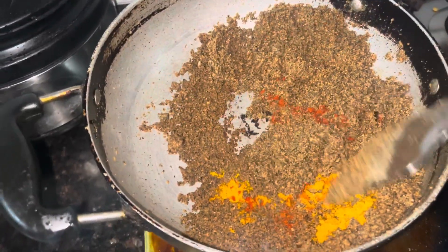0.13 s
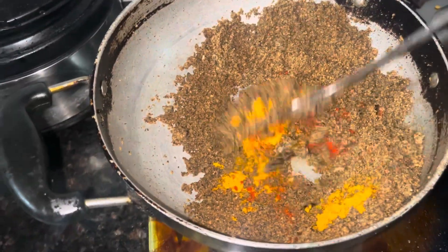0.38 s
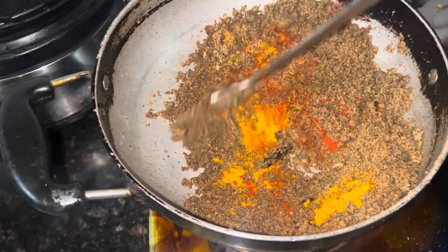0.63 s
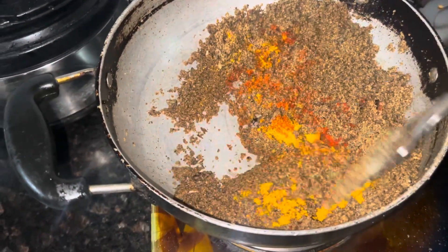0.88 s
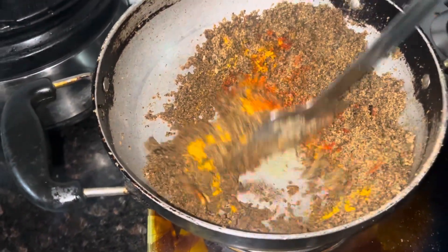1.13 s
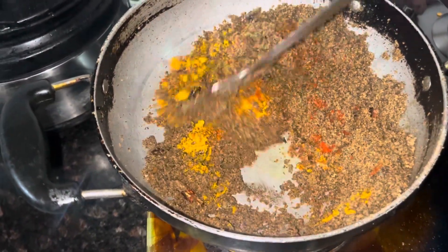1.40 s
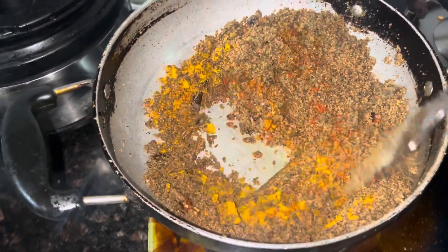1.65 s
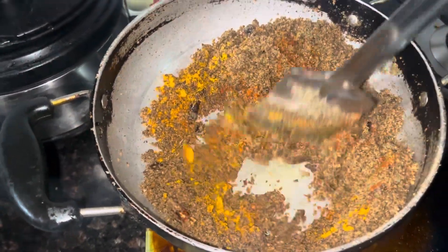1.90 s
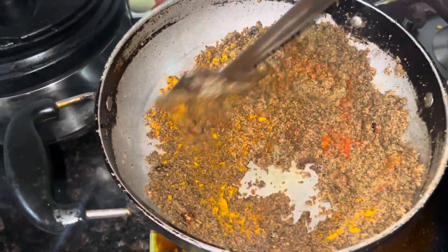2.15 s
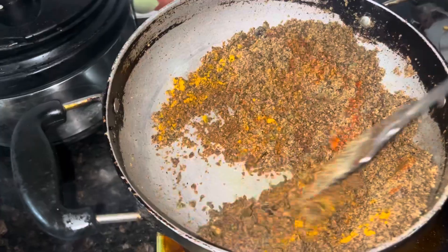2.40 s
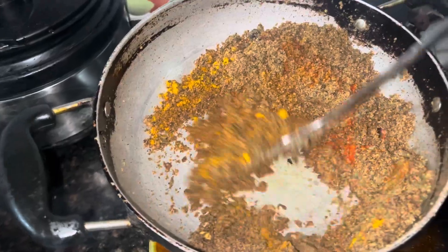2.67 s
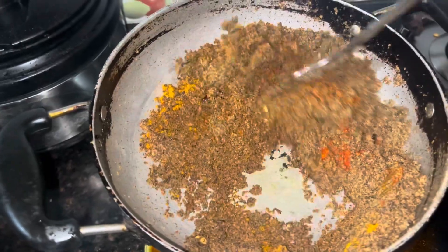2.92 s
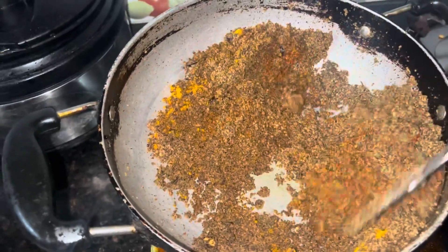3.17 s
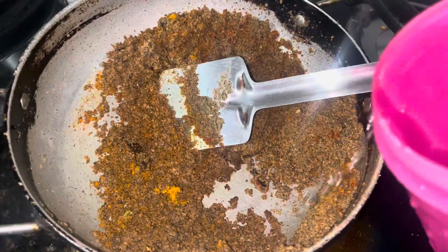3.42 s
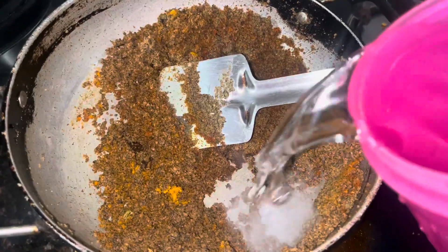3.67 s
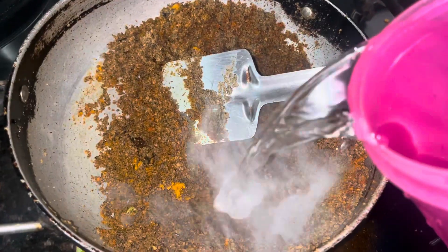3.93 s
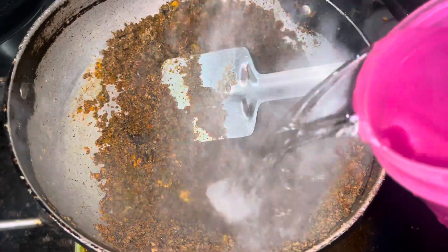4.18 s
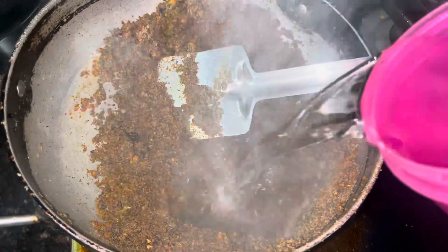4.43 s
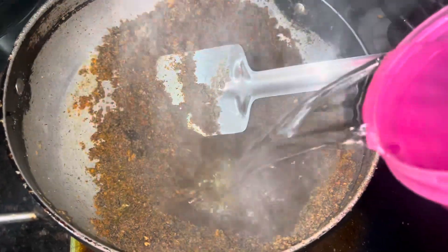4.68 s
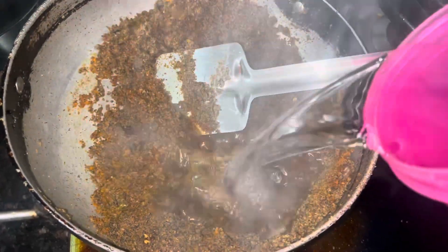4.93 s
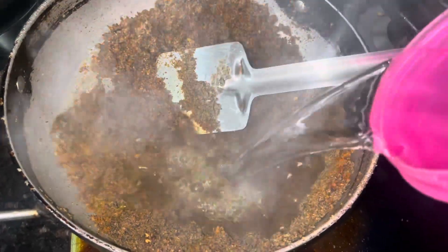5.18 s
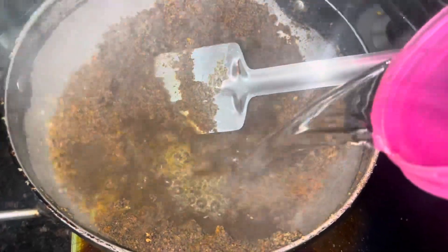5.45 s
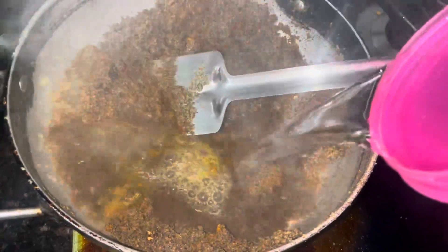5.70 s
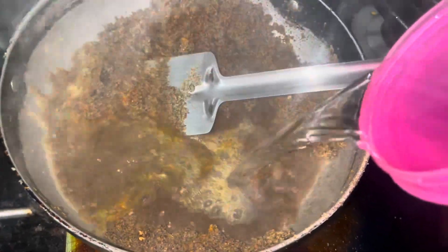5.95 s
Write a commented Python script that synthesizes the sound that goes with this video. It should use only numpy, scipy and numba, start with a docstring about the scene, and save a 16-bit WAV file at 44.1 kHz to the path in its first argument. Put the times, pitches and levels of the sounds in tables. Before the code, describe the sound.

Uneven short strokes scrape a gritty dry mix around a pan, punctuated by dull clanks, the strongest around two seconds. The sound cuts for an instant, then turns to wide, steady steam hiss as water lands, bubbling underneath. Light metal rattles appear and cluster near the end. Close stereo phone pickup in a small kitchen, short reflections, soft hum and rumble.

```python
"""A low hum wavers over kitchen rumble from start to end: two sines over coloured noise.
From the start a steel spatula scrapes and knocks a thin pan of dry mix, close to a two-port phone microphone:
crackling noise and short rough pushes drive the pan's modes. The sound then drops out briefly.
Poured water flashes to steam, a bright noise hiss over a boil that builds up; later the resting spatula
rattles, its modes rung by quick contacts."""
import sys
import numpy as np
from scipy import signal
from scipy.fft import rfft, irfft, next_fast_len
from scipy.io import wavfile
from scipy.ndimage import uniform_filter1d
from numba import njit

SR = 44100
rng = np.random.default_rng(int(sys.argv[2]) if len(sys.argv) > 2 else 0)


def makeup_ratio(level_db):
    """Linear amplitude ratio for a level in decibels (20 dB per factor of ten)."""
    decades = np.asarray(level_db, float) / 20
    return 10 ** decades


def to_wav(s):
    """Save 16-bit WAV."""
    ch = np.atleast_2d(s).T  # columns
    pcm = np.round(np.clip(ch, -1, 1) * 32767)  # PCM
    wavfile.write(sys.argv[1], SR, pcm.astype(np.int16))


N = 268012
T = np.arange(N) / SR  # time in s
FFT_SIZE = next_fast_len(N + SR)
F = np.arange(FFT_SIZE // 2 + 1) * SR / FFT_SIZE  # spectrum bins in Hz

# Kitchen background: t/s, hum level/dB, rumble level below RUMBLE_TOP_HZ/dB
KITCHEN = [(0.0, -53, -55), (0.76, -49, -57), (1.2, -56, -52), (1.59, -42.5, -42), (1.85, -53, -55),
           (1.94, -42.5, -38), (2.5, -63, -54), (2.66, -47.5, -52.5), (3.82, -54.5, -57.5),
           (4.01, -38, -48.5), (4.35, -51, -45), (4.49, -36, -51), (4.91, -41.5, -42.5), (4.99, -59, -49),
           (5.11, -39, -45), (5.33, -42, -49.5), (5.6, -42, -42.5), (5.82, -30, -42), (6.04, -44, -42.5),
           (6.08, -54, -71)]
# Partials of the hum, before its pitch wavers: f/Hz, relative level/dB
HUM = [(103.5, 0.5), (207, -11.5)]
# Spectrum of the rumble: f/Hz, relative level/dB
RUMBLE = [(20, -56), (30, -48), (45, -39), (65, -2), (90, -0.5), (130, -8.5), (200, -19), (270, -5.5),
          (400, -9.5), (600, -16.5), (1500, -33), (3000, -32), (7000, -40.5), (13000, -40), (15000, -48)]
RUMBLE_TOP_HZ = 88

# Strokes of the blade through the mix: start t/s, length/s, grit level at the swell's end/dB,
# finest grit relative level/dB, low rubbing relative level/dB, blade resonance f/Hz
STROKES = [(.008, 0.12, -54, -12, -6, 2060), (0.147, 0.041, -54.5, 16, -6, 1780),
           (0.192, .1, -52.5, 10, -5.5, 1550), (.298, 0.025, -51, 23, 1, 1470),
           (0.338, 0.052, -56, 13, 1, 1400), (0.575, 0.037, -44, 16, -12, 1850),
           (0.623, 0.062, -30.5, 11.5, -32, 2050), (0.965, 0.065, -49, 6, 5, 1350),
           (1.04, 0.068, -38.5, 11, -6, 1530), (1.167, .012, -52, 17.5, 8, 1180),
           (1.26, 0.027, -50, 1, -4, 1640), (1.334, 0.038, -36.5, -1, -13.5, 1900),
           (1.378, 0.091, -31.5, 11, -23, 1650), (1.508, .045, -34.5, 13, -4.5, 1550),
           (1.565, 0.043, -43.5, 12, 1, 1400), (1.63, 0.13, -48, -2, -7, 1470),
           (1.781, 0.044, -44.5, 18, 4, 1290), (1.842, 0.054, -41, 0, -2, 1550),
           (1.892, 0.021, -22.5, 3.5, -15, 1450), (1.948, 0.078, -33.5, -5, -1, 1390),
           (2.054, .065, -44.5, 4, 4, 1750), (2.173, .012, -37.5, 16, -5, 1800),
           (2.2, 0.025, -29.5, 7.5, -2, 1570), (2.394, 0.013, -54, 15, -1, 1170),
           (2.576, 0.034, -33.5, 9.5, -16, 1810), (2.612, 0.03, -31, 8.5, -19, 1900),
           (2.832, 0.015, -52, 15, 4, 1180), (2.896, 0.096, -58, 21.5, -16, 1800),
           (3.219, 0.038, -61, 23, 8, 1600), (3.274, .045, -41.5, 14, -6, 1550)]
# Bands in which single crumbs scratch, before they drift: f/Hz
SCRATCH_BANDS = [2680, 3510, 4330, 5220, 7060, 8800]
# Knocks of the blade, as they drive the pan: t/s, level/dB, strongest ring f/Hz, brightness/dB, fade time/s
KNOCKS = [(.309, -30, 425, -19, 0.033), (0.587, -27, 5000, 2, 0.0019), (0.599, -24, 370, -0.5, 0.01),
          (0.628, -20, 2030, -22, 0.021), (0.967, -29.5, 346, -10, .03), (.975, -26.5, 174, -23, 0.047),
          (0.982, -23, 468, -28, 0.021), (1.046, -28, 504, -4, 0.013), (1.072, -15, 670, -9.5, 0.014),
          (1.105, -23.5, 1000, -8.5, 0.0089), (1.182, -25, 980, -13, 0.0057), (1.359, -25, 397, -3, 0.015),
          (1.458, -24, 1420, 2, 0.03), (1.53, -27, 490, 3, 0.064), (1.79, -20, 484, -10, 0.0039),
          (1.809, -19.5, 614, -11.5, 0.023), (1.86, -28.5, 1100, -4, 0.0067),
          (1.901, -4.5, 554, -10, 0.025), (1.915, -10.5, 485, 0.5, 0.063), (2.084, -17, 1800, -27, 0.0065),
          (2.18, -22.5, 1800, 1.5, 0.0075), (2.213, -2, 566, -7, 0.0052), (2.402, -31, 1060, -11, 0.0095),
          (2.473, -34.5, 1090, -4.5, .006), (2.59, -19.5, 650, -0.5, 0.018),
          (2.625, -24.5, 1910, 3.5, 0.024), (2.681, -22, 970, -3, 0.0074),
          (2.773, -32.5, 1000, -10, 0.0084), (2.839, -34, 1040, 1, 0.007), (2.885, -29.5, 486, -15, 0.0058),
          (3.021, -28, 1000, -6, 0.0083), (3.228, -37.5, 1010, -7, 0.0085), (3.278, -16, 670, -7, 0.0089),
          (3.301, -19, 680, -13, 0.018)]
# Modes of the loaded pan: f/Hz, width/Hz, level at the centre/dB
PAN_MODES = [(343, 17, 3), (402.3, 18.6, 14.5), (467.3, 15.6, 7.5), (593, 46, 2), (790, 92, -3),
             (861, 57, 2), (1130, 100, -7.5), (1394, 220, -5.5), (1850, 78, -10.5), (2060, 70, -11),
             (2540, 21, -15), (3210, 590, -2.5), (4040, 306, -5), (5490, 37, -0.5)]
# Sound radiated directly by the contact with the pan: f/Hz, level/dB
CONTACT = [(100, -17), (250, 0.5), (700, 3), (1500, -5.5), (3000, -4.5), (5500, -5.5), (8000, -11.5),
           (12000, -16), (15500, -23)]

# Dropout of the whole sound before the pour: t/s, level/dB
DROPOUT = [(3.318, -0.5), (3.326, -48), (3.345, -46), (3.365, -55), (3.378, -3.5)]

# Water on hot steel: t/s, hiss level/dB, top hiss relative level/dB
POUR = [(3.5, -32, 11.5), (3.68, -34.5, 10), (3.79, -23.5, 7.5), (4.0, -23.5, 3.5), (4.21, -23, 3),
        (4.39, -25.5, 5.5), (4.73, -26, 4.5), (5.1, -24.5, 7), (5.29, -24, 8.5), (5.6, -24, 5.5),
        (5.73, -25, 8), (5.85, -21, 5.5), (5.95, -21, 5.5), (6.0, -26, 4.5), (6.08, -30.5, 10)]
# Spectrum of the hiss: f/Hz, relative level/dB
HISS = [(500, -11), (1000, -10), (2000, -5), (2800, 0), (4000, -0.5), (7000, 0.5), (10000, 1.5),
        (13000, -1), (15500, -2.5)]
# Spectrum of the boil: f/Hz, relative level/dB
BOIL = [(120, -17), (250, -3), (500, 2), (900, -4), (1600, -5), (2500, -17.5)]

# Contacts of the resting spatula with the steel: t/s, level/dB, strongest ring f/Hz, brightness/dB, fade time/s
CHATTER = [(4.686, -25.5, 442, -25, 0.036), (4.833, -21, 535, -4, 0.029), (4.836, -18, 2370, -17, 0.017),
           (4.842, -21, 1490, -6, 0.018), (4.87, -25.5, 1130, -8, 0.034), (5.252, -26, 320, -6, 0.029),
           (5.265, -26, 1510, -3.5, 0.035), (5.30, -27, 564, -8, 0.02), (5.593, -23.5, 486, -8, 0.042),
           (5.70, -23.5, 480, -4.5, 0.022), (5.822, -25.5, 1510, -2, .016), (5.843, -18.5, 2410, -3, 0.034),
           (5.85, -22, 208, -26, 0.039), (5.857, -24.5, 1040, 5, .03), (5.872, -15.5, 442, -3.5, 0.018),
           (5.898, -16, 510, -2.5, 0.021), (5.914, -14.5, 1380, -9, .022), (5.92, -16, 430, -2.5, 0.038),
           (5.927, -16.5, 2370, -14, 0.017), (5.955, -27.5, 1810, -2, 0.022), (5.965, -28.5, 1040, 2, .038),
           (6.02, -33, 430, -14, .032)]
# Modes of the spatula: f/Hz, width/Hz, level at the centre/dB
SPATULA_MODES = [(422, 30, 1), (574, 51, -5), (1040, 27, -4.5), (1380, 34, -1.5), (1510, 52, -2.5),
                 (1810, 25, -2), (2370, 45, 0.5), (3080, 55, -4.5), (3824, 27, 1), (4430, 69, -8),
                 (4990, 87, -1.5), (5700, 70, -15)]

# Phase lead of the left port over the right, stirring angle: f/Hz, lead/rad
STIR_LEAD = [(0, 0), (800, -2.2), (1300, 0), (2000, .5), (2700, 3), (4500, .5), (6050, 3.14), (7700, 6.1),
             (8500, 6.4), (9900, 9.3), (10800, 9.5), (11900, 12.5), (13200, 12.7), (14300, 15.6),
             (16000, 15.8)]
# Level of the left port over the right, stirring angle: f/Hz, level/dB
STIR_PAN = [(60, -.5), (400, -.5), (900, -4), (2500, -4), (3500, 0), (5000, -1), (6000, 0), (16000, 0)]
# Phase lead of the left port over the right, pouring angle: f/Hz, lead/rad
POUR_LEAD = [(0, 0), (700, .7), (1200, .3), (2200, .3), (3300, 1.3), (4600, .2), (6700, -1.5), (7800, -3.1),
             (8900, -3.2), (11200, -6.25), (13000, -6.3), (14700, -9.4), (16000, -9.45)]
# Level of the left port over the right, pouring angle: f/Hz, level/dB
POUR_PAN = [(60, 0), (400, 0), (900, 3), (1800, 0), (2600, 3), (4000, 5), (6000, 4), (7400, 0), (16000, 0)]
# Spectrum of the reflections, before each source's room level: f/Hz, level/dB
ROOM = [(100, -18), (400, -5.5), (1200, 1), (4000, -6), (7000, -8), (15000, -9)]


def level(x, db=0):
    """Scale to an rms level."""
    return x * makeup_ratio(db) / np.sqrt(np.mean(x ** 2))


def curves(table):
    """Columns of a table, joined by straight lines over time."""
    s, *columns = np.transpose(table)
    return [np.interp(T, s, column) for column in columns]


def shape(points):
    """dB points read on a log-frequency axis."""
    hz, db = np.transpose(points)
    return np.interp(np.log(F + 1), np.log(hz), db)


def colour(x, points):
    """Filter by a spectrum of points."""
    return irfft(rfft(x, FFT_SIZE) * makeup_ratio(shape(points)), FFT_SIZE)[..., :N]


def split(x, hz):
    """Low part, and the high part that remains."""
    low = signal.sosfilt(signal.butter(2, min(hz, 20000), fs=SR, output="sos"), x)
    return low, x - low


def grains(spread_db):
    """Noise whose samples differ in size: a dense crackle."""
    size_db = spread_db * np.minimum(rng.exponential(size=N), 5)
    return level(rng.standard_normal(N) * makeup_ratio(size_db))


def walk(rate):
    """Random levels held for 1 / rate s and slewed twice."""
    hold = int(SR / rate)
    steps = np.repeat(rng.standard_normal(N // hold + 1), hold)
    return uniform_filter1d(uniform_filter1d(steps, hold), hold)[:N]


@njit
def sweep(x, hz, share):
    """Band-pass whose centre moves; its width is a share of the centre."""
    y, band, low = np.empty(len(x)), 0., 0.
    for i in range(len(x)):
        g = np.tan(np.pi * hz[i] / SR)
        v = (band + g * (x[i] - low)) / (1 + g * (g + share))
        band, low, y[i] = 2 * v - band, low + 2 * g * v, share * v
    return y


def ring(x, modes, shift_db):
    """Two-pole resonances; a moving contact drives each more or less strongly."""
    out = np.zeros(N)
    live = slice(np.flatnonzero(x)[0], np.flatnonzero(x)[-1])
    knots = T[live][::1500]
    for hz, width, db in modes:
        pole = np.exp((2j * hz - width) * np.pi / SR)
        strength = makeup_ratio(db + shift_db * rng.standard_normal(len(knots)))
        drive = x[live] * np.interp(T[live], knots, strength)
        gain = 2 * (1 - abs(pole)) * pole.imag
        out[live] += signal.lfilter([0, gain], [1, -2 * pole.real, abs(pole) ** 2], drive)
    return out


def kitchen():
    """A hum whose pitch and level waver, over a rumble."""
    hum_db, rumble_db = curves(KITCHEN)
    phase = 2 * np.pi * np.cumsum(1 + 0.019 * walk(8)) / SR  # of a 1 Hz cycle
    hum = level(sum(makeup_ratio(db) * np.sin(hz * phase) for hz, db in HUM))
    rumble = colour(rng.standard_normal(N), RUMBLE)
    rumble = rumble / np.std(split(rumble, RUMBLE_TOP_HZ)[0])
    return hum * makeup_ratio(hum_db) + rumble * makeup_ratio(rumble_db)


def strokes(db, fade_db_per_s, still_db):
    """Gain of each stroke: the blade bites, presses harder, lifts quickly, and crumbs settle more slowly.

    The last row is the level between strokes."""
    bite_s, swell_db_per_s = 0.012, 87  # the swell lasts until the stroke ends
    lift_db_per_s, settle_db = 420, -12.5
    s, length = np.transpose(STROKES)[:2, :, None]
    late = T - s - length  # time after the end of the stroke
    bite = np.clip((T - s) / bite_s, 0, 1)
    swell = makeup_ratio(db[:, None] + swell_db_per_s * late.clip(max=0))
    lift = makeup_ratio(-lift_db_per_s * late.clip(0))
    settle = makeup_ratio(settle_db - fade_db_per_s * late.clip(0))
    gain = bite * swell * np.maximum(lift, settle)
    return np.vstack([gain, np.full(N, makeup_ratio(still_db))])


def scratches():
    """Crumbs caught under the blade squeak in narrow bands that drift, come and go."""
    bands = np.zeros(N)
    for hz in SCRATCH_BANDS:
        squeak = sweep(grains(4.0), hz * (1 + .07 * walk(15)), .045)
        bands += level(squeak) * makeup_ratio(7 * walk(35))
    return level(bands, -0.5)


def knocks(table, focus):
    """Each blow is a short rough push, strongest near one ring; focus says how narrowly."""
    force = np.zeros(N + SR)
    t = T[:8192]
    noises = rng.standard_normal((len(table), 2, len(t)))
    for (s, db, hz, bright_db, length), rough in zip(table, noises):
        fade = np.exp(-t / max(length, .001))
        thud = signal.lfilter(*signal.iirpeak(hz, focus, fs=SR), rough[0] * fade)
        thud = thud * makeup_ratio(-9.5) * np.sqrt(np.sum(fade ** 2) / np.sum(thud ** 2))
        band = split(split(rough[1], 9900)[0], 730)[1]
        tick = level(band, bright_db + 0.5) * fade ** 1.78  # fades sooner than the thud
        i = int(s * SR)
        force[i:i + len(t)] += makeup_ratio(db) * (thud + tick)
    return force[:N]


def pan_body(force):
    """The load damps the pan's modes; the contact also radiates directly."""
    return ring(force, PAN_MODES, 1.06) + colour(force, CONTACT)


def total(gains):
    """Sum of gains by power."""
    return np.sqrt(np.sum(gains ** 2, 0))


def stirring():
    """The blade sticks and slips in uneven bursts; crumbs add grit; the bending blade sings in its own band."""
    grit_db, fine_db, low_db, hz = np.transpose(STROKES)[2:]
    # fades after each stroke in dB/s, then levels between strokes in dB
    grit_gain = strokes(grit_db, 140, -71)
    fine_gain = strokes(grit_db + fine_db, 162, -56)
    low_gain = strokes(grit_db + low_db, 70, -63.5)

    # the strongest stroke pulls the blade's pitch towards its own
    press = grit_gain ** 2
    blade_hz = np.append(hz, np.mean(hz)) @ press / press.sum(0)
    blade_hz = blade_hz * (1 + 0.063 * walk(29.87))
    blade = level(sweep(grains(3.5), blade_hz, .1), -4) * makeup_ratio(5 * walk(90))

    rub = level(split(grains(2.1), 800)[0]) * total(low_gain)
    grit, fine = split(split(grains(3.8), 2100)[1], 9750)
    grit = (level(grit, -1) + blade + scratches()) * total(grit_gain)
    fine = level(fine) * total(fine_gain)
    slip = makeup_ratio(2.3 * walk(90))
    force = (rub + grit + fine) * slip + knocks(KNOCKS, 2.56)
    return pan_body(force * (T < 3.4))


def steam():
    """Countless tiny bursts of vapour; each band flickers a little. Larger bubbles boil underneath."""
    lands_s, splash_s = 3.48, 0.012
    boil_db, boil_start_db, boil_build_s = -34.5, -54, 0.24
    hiss_db, top_db = curves(POUR)
    start = np.clip((T - lands_s) / splash_s, 0, 1)
    hiss, top = split(colour(grains(0.79), HISS), 8760)
    hiss = level(hiss) * makeup_ratio(hiss_db + 1.3 * walk(25))
    top = level(top) * makeup_ratio(hiss_db + top_db + 0.99 * walk(25))
    # the boil builds up as the pool spreads
    unbuilt = np.exp(-np.maximum(T - lands_s, 0) / boil_build_s)
    build_db = boil_db + (boil_start_db - boil_db) * unbuilt
    boil = level(colour(grains(2.94), BOIL)) * makeup_ratio(build_db + 3.5 * walk(30))
    return start * (hiss + top + boil)


def chatter():
    """Quick contacts ring the resting spatula; the contacts' lower part is heard directly."""
    force = knocks(CHATTER, 7.2)
    ringing = makeup_ratio(14.0) * ring(force, SPATULA_MODES, 0.91)
    direct = makeup_ratio(-1.0) * split(force, 6200)[0]
    return ringing + direct


def ports(x, lead, pan, room_db):
    """Two ports hear the direct sound with a phase lead, and unrelated reflections."""
    room_t60_s = 0.15  # time to fade by 60 dB
    hz, radians = np.transpose(lead)
    half = np.exp(.5j * np.interp(F, hz, radians)) * makeup_ratio(shape(pan) / 2)  # each port takes half
    t = T[:SR]
    tail = rng.standard_normal((2, SR)) * makeup_ratio(-60 * t / room_t60_s) * (t > .003)
    tail = tail / np.sqrt(np.sum(tail[0] ** 2))
    room = rfft(tail, FFT_SIZE) * makeup_ratio(shape(ROOM) + room_db)
    direct = np.array([half, 1 / half])
    return irfft(rfft(x, FFT_SIZE) * (direct + room), FFT_SIZE)[:, :N]


def scene():
    """Stirring, then the pour and the chatter, heard from another angle; the kitchen lies under both."""
    room = kitchen()
    first = T < 3.355
    stir = ports((stirring() + room) * first, STIR_LEAD, STIR_PAN, -4.0)
    pour = ports(steam() + room * ~first, POUR_LEAD, POUR_PAN, -0.098)
    rattle = ports(chatter(), POUR_LEAD, POUR_PAN, 4.0)
    return stir * first + pour + rattle


def low_pass(x):
    """Removes everything above the highest recorded frequency."""
    return signal.sosfilt(signal.butter(12, 15800, fs=SR, output="sos"), x)


def record(dry):
    """The level drops out for a moment before the pour."""
    mix = dry * makeup_ratio(curves(DROPOUT)[0])
    return low_pass(mix)


dry = scene()
out = record(dry)
to_wav(out)
```